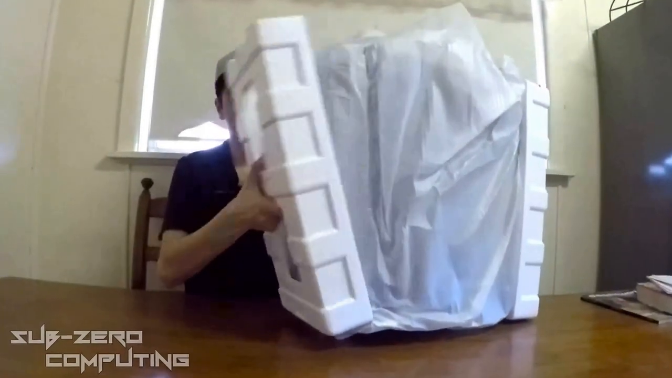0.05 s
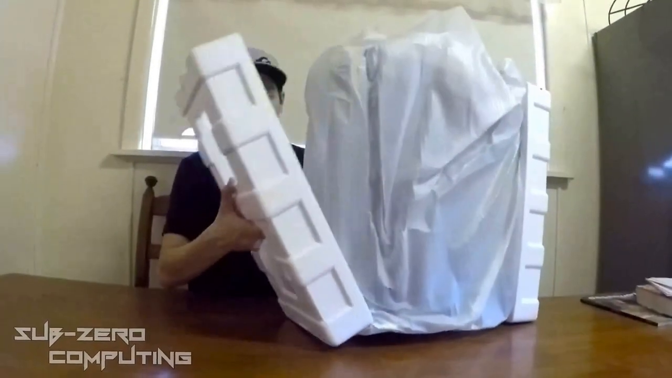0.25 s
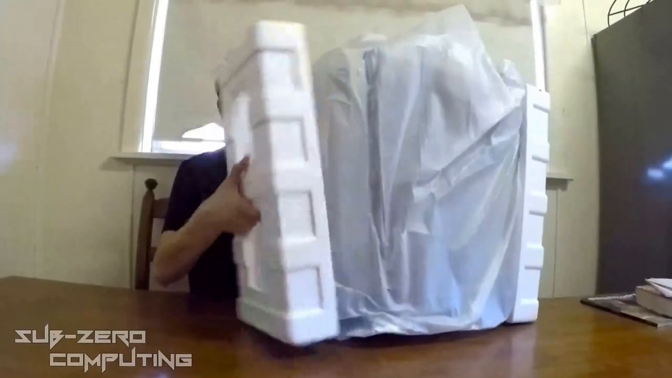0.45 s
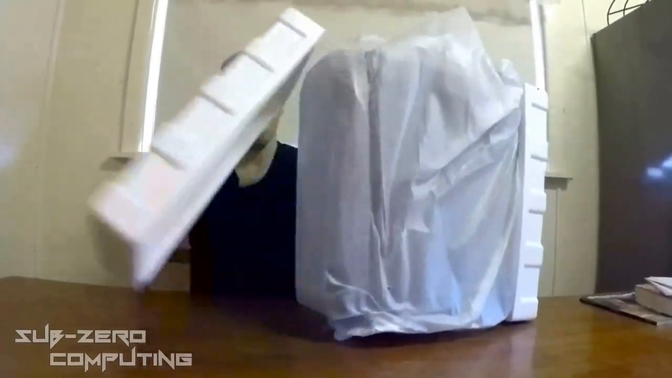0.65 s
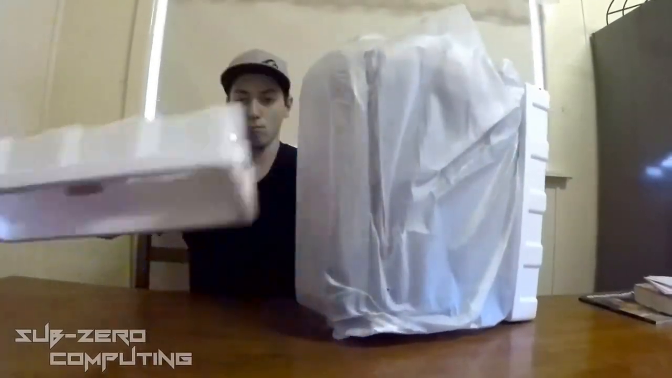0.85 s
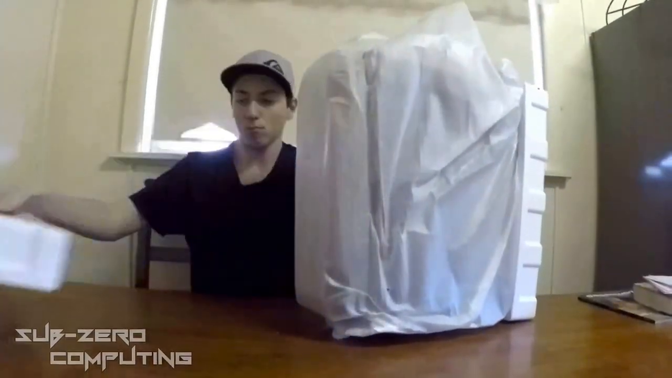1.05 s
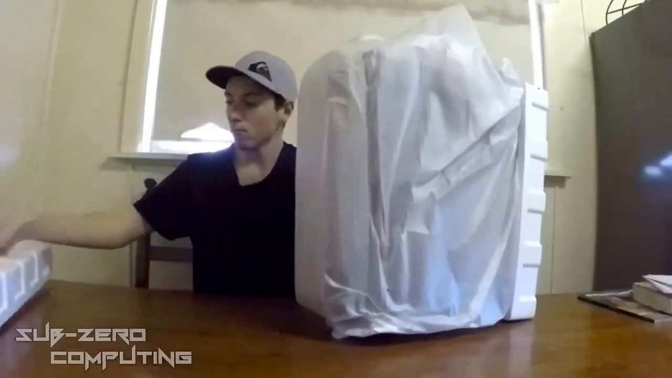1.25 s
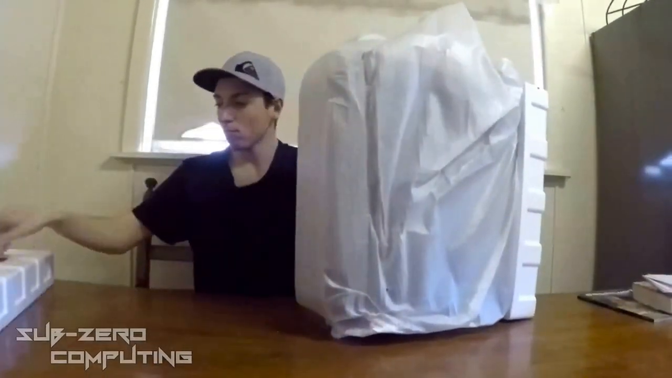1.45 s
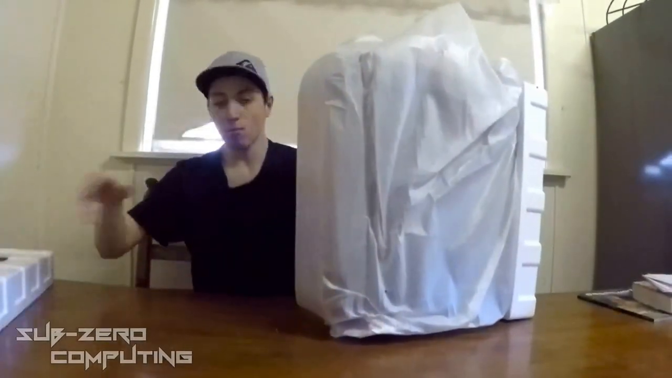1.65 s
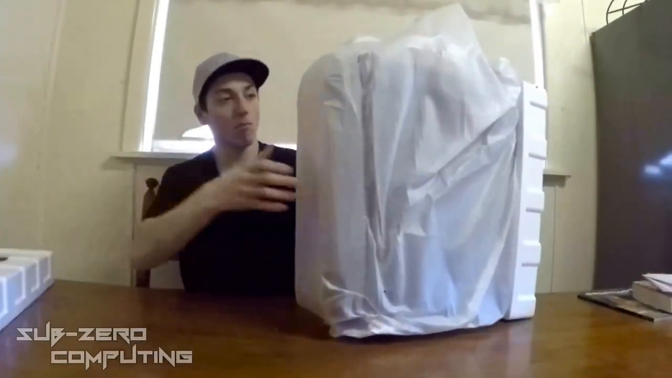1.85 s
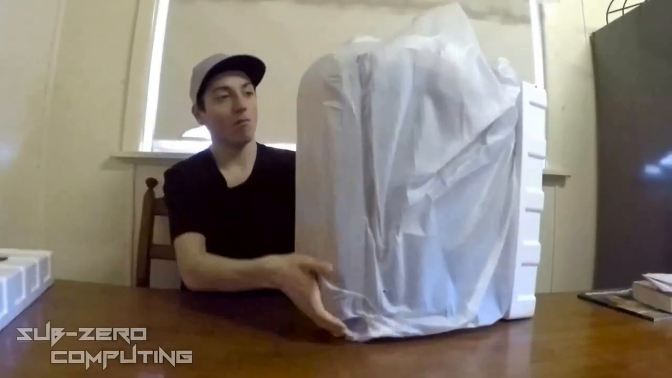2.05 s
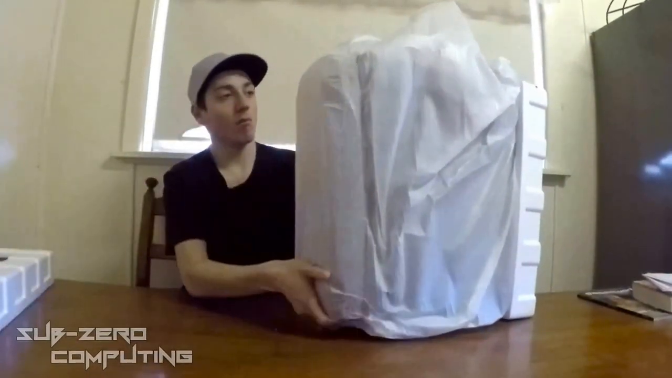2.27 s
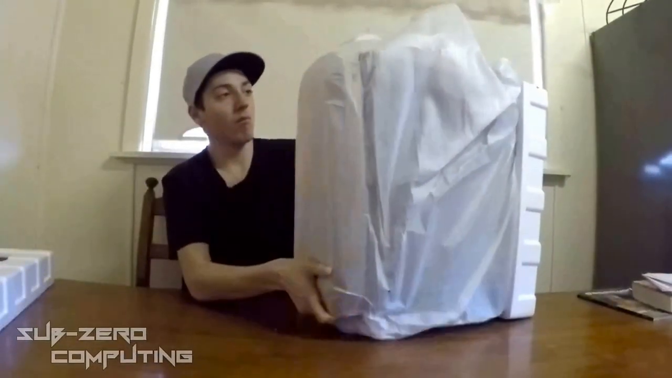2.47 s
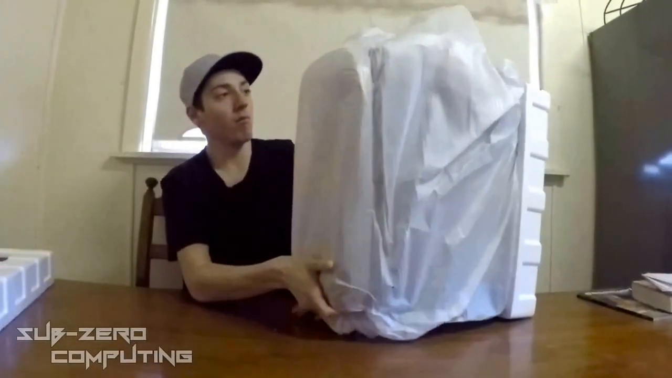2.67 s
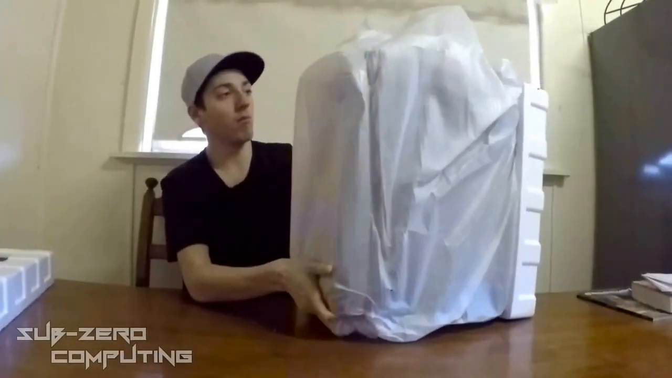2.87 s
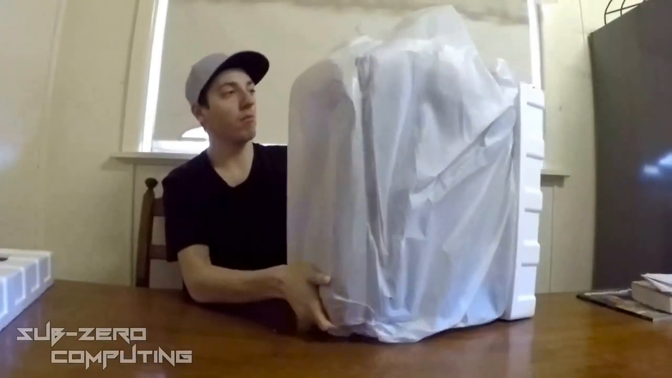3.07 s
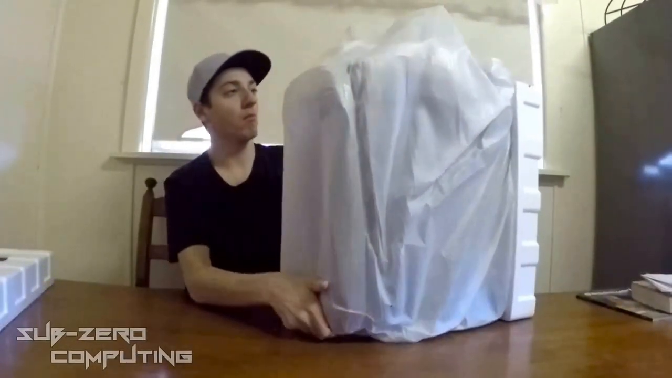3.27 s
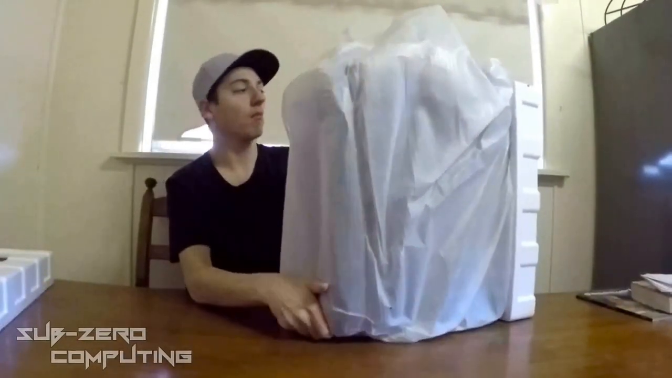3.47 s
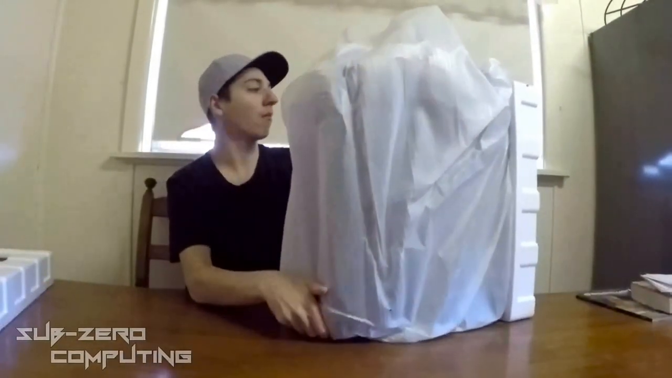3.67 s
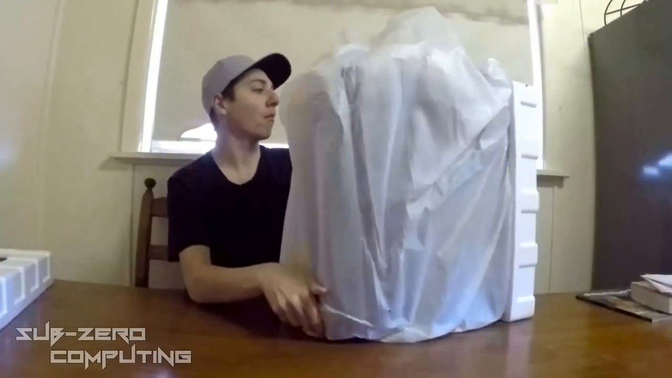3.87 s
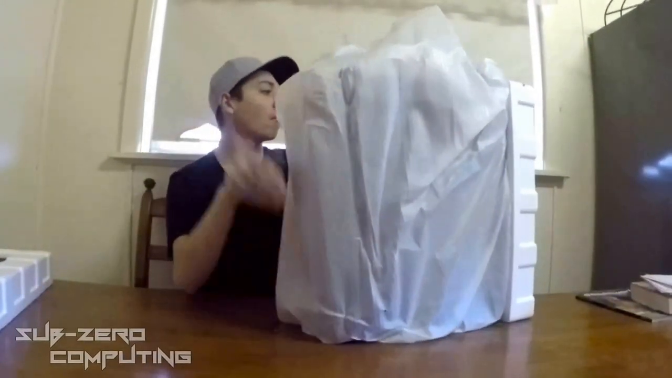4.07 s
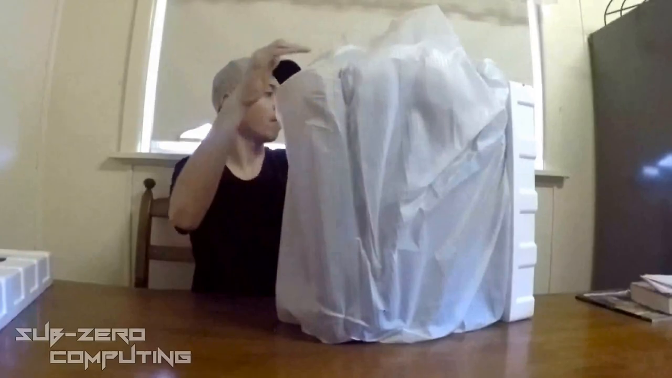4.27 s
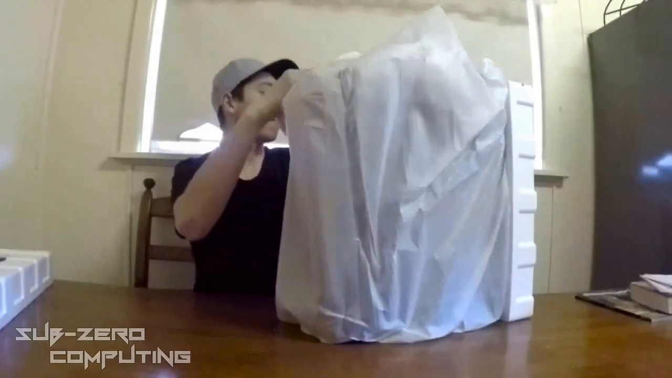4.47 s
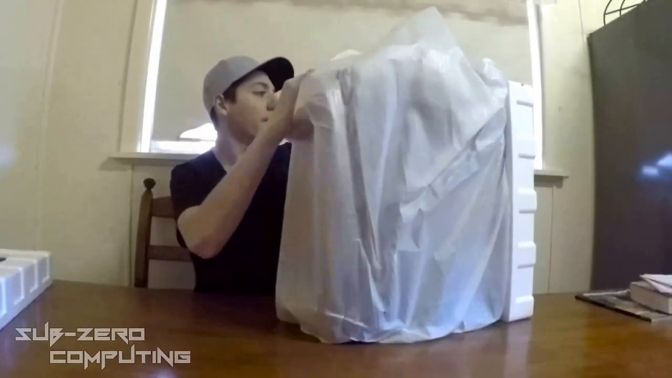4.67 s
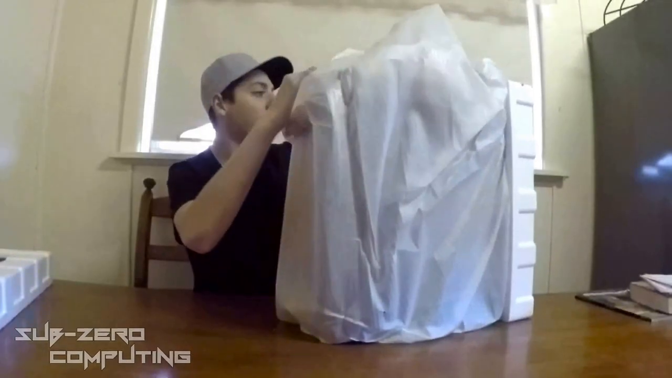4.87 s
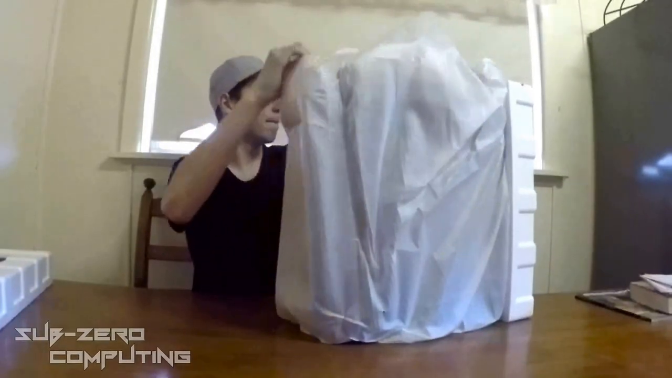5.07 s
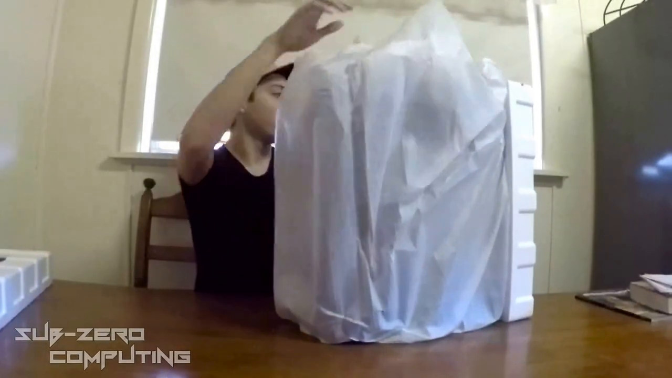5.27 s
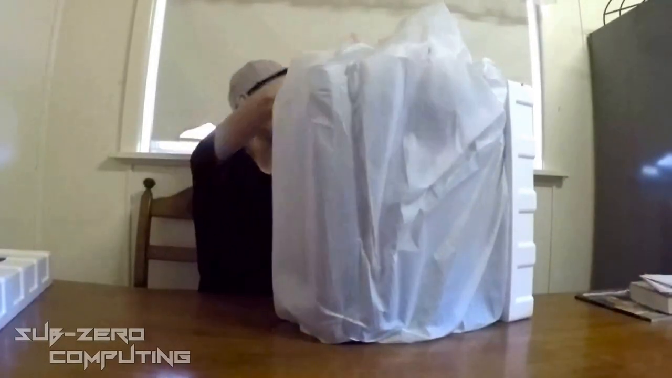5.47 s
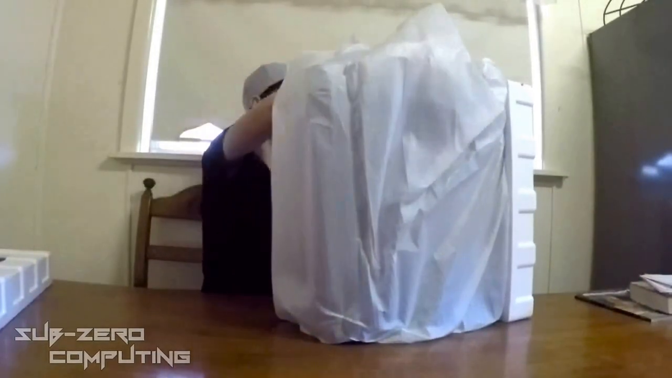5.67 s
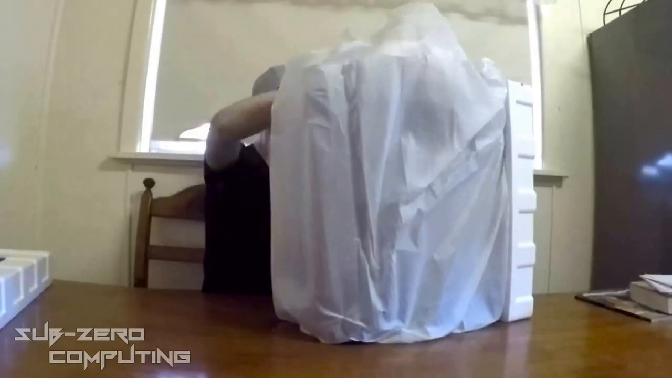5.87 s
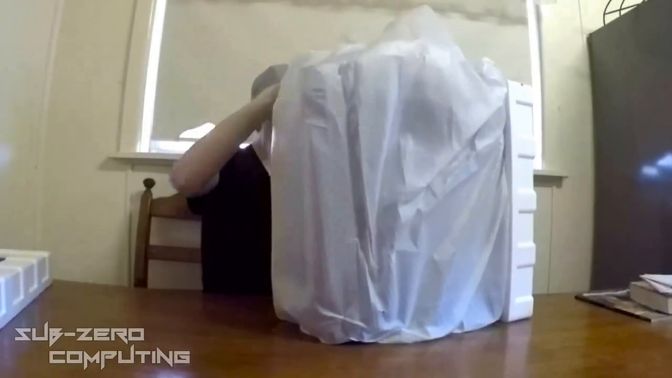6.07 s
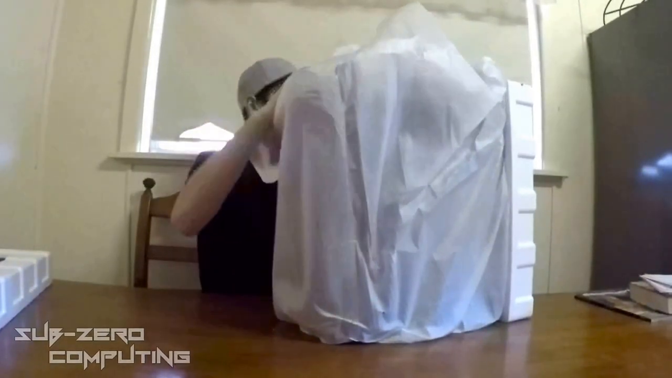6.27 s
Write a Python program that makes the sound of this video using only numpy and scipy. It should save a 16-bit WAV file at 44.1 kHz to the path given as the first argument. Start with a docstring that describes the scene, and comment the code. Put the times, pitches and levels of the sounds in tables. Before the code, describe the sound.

Soft plastic crinkling, a loud boxy polystyrene clack on wood, dry chair creaks, a deep table thump, then faint rustling over a low hum.

```python
"""Foam slab dropped on a wooden table

A polystyrene end cap is pulled off a bagged appliance and dropped on a wooden table in a small, bare room.
The slab and the table top knock as decaying modes with a broad clack; the heavy appliance thumps back down.
A wooden chair creaks by stick-slip clicks through resonances, the bag crinkles as clicks and hiss and snaps
in short noise bursts, weight shuffles dully, and shaped noise and wavering tones make a low household hum."""
import sys
import numpy as np
from scipy import signal
from scipy.fft import rfft, irfft
from scipy.io import wavfile

SR = 44100
rng = np.random.default_rng(int(sys.argv[2]) if len(sys.argv) > 2 else 0)


def persist_wave(psi):
    """Save psi, clipped to +-1, as 16-bit WAV."""
    counts = np.round(np.clip(psi, -1, 1) * 32767).astype(np.int16)
    wavfile.write(sys.argv[1], SR, np.atleast_2d(counts).T)


N = 279153
T = np.arange(N) / SR  # s
FREQS = np.maximum(np.fft.rfftfreq(8192, 1 / SR), 1)  # Hz, kept above zero for the log axis

# All levels are mix levels relative to their own layer; each layer sets its balance further down.

# still room noise: (frequency [Hz], density [dB per Hz])
AIR_SPECTRUM = [(20, 3), (38, -6.5), (65, -4.5), (105, -14), (150, -8), (200, -19.5), (300, -21),
                (450, -26), (800, -30), (1500, -32), (4000, -31.5), (7000, -42.5), (15000, -50.5)]
# steady household tones: (frequency [Hz], rms level [dB])
HUM_TONES = [(32.3, -62), (101, -57), (148, -69), (420, -73)]
# echo decay by band: (frequency [Hz], t60 [s])
ROOM_T60 = [(100, 0.27), (500, 0.77), (2000, 0.98), (5000, 0.82), (14000, 0.36)]

# arms and load shuffle on the table: (time [s], length [s], level [dB], swell from start to end [dB])
SHUFFLES = [(.29, .08, -42, -1), (.46, 0.18, -46, 2), (1.86, 0.59, -51.5, 14), (2.56, 0.1, -38, 9),
            (2.69, 0.075, -40.5, -8), (3.05, 0.086, -47.5, 6), (3.68, 0.12, -53, 5),
            (4.31, 0.058, -49.5, 5), (5.1, 0.13, -56, -2), (6.23, 0.048, -49.5, 6)]
# dull rubbing colour: (frequency [Hz], density [dB per Hz])
SHUFFLE_SPECTRUM = [(25, 8), (70, 12), (130, 6), (220, 9.5), (320, -14), (500, -6), (1200, -8.5),
                    (5000, -26)]
# how a shuffle sets in and dies away: (attack [s], release time constant [s])
SHUFFLE_SHAPE = (0.0077, 0.011)

# a hand or the foam strokes the bag:
# (time [s], length [s], level [dB], swell from start to end [dB], relative fizz [dB])
RUSTLES = [(0, 0.28, -55, -13.5, -0.5), (.27, 0.21, -52, -2.5, 1), (.445, 0.021, -50, -12, 6.5),
           (.555, 0.15, -57, -18.5, -1.5), (.73, 0.053, -56, 2, 0), (.785, 0.037, -53.5, -4, 0.5),
           (.895, 0.045, -57, 5, -14), (1.03, 0.24, -56, -21, 1), (1.255, .05, -46.5, -10, -3),
           (1.47, 0.044, -55.5, 4, -5), (2.02, 0.099, -52.5, -2, -6), (2.11, 0.19, -55, -7, -0.5),
           (2.31, 0.25, -51, 13.5, -1.5), (2.81, .1, -55, -10, 2.5), (3.19, 0.13, -52.5, -9, -1),
           (3.41, 0.17, -58.5, -6, -1), (3.67, 0.048, -57, 1, -0.5), (3.8, 0.21, -59.5, 10, 2.5),
           (3.945, 0.12, -47, -3, -7), (4.39, 0.3, -61, -3, 3), (4.68, 0.044, -62.5, -5.5, -1),
           (4.76, 0.17, -67, 8.5, 3), (4.95, 0.15, -57.5, 3, 4.5), (5.095, 0.12, -54.5, 3.5, 1),
           (5.26, 0.11, -71, 0, 3), (5.72, 0.12, -60.5, 3.5, 3.5), (5.96, 0.19, -60, 3, 2),
           (6.165, 0.12, -55.5, 2, 2.5)]
# body of the plastic film: (frequency [Hz], density [dB per Hz])
FILM_SPECTRUM = [(120, -1), (300, 2.5), (600, 0.5), (1000, 0), (1800, -1.5), (2500, -1.5), (4100, -2),
                 (5500, -5), (8000, -22), (15000, -30.5)]
# bright edge of the film: (frequency [Hz], density [dB per Hz])
FIZZ_SPECTRUM = [(3000, -12.5), (6000, 2.5), (8500, 0.5), (11000, -3), (15000, -8)]
# how a rustle sets in and dies away: (attack [s], release time constant [s])
RUSTLE_SHAPE = (0.004, 0.038)
# single creases snap: (time [s], peak level [dB], relative fizz [dB])
SNAPS = [(0.233, -36, 1), (0.347, -33, -25), (.665, -32.5, 9), (.898, -50, -12), (0.95, -37, -6),
         (2.026, -37, 3), (3.046, -29, 5), (3.993, -27, -9), (4.021, -25.5, -6), (4.237, -31, -15.5),
         (4.909, -38.5, -27)]
# colour of a snap: (frequency [Hz], density [dB per Hz])
SNAP_SPECTRUM = [(500, -26.5), (1300, 0), (2000, -1.5), (4200, 0.5), (6000, -20.5), (15000, -47)]

# the chair creaks as weight shifts: (time [s], length [s], level [dB], swell from start to end [dB],
# relative low frame ring [dB], relative grit [dB])
CREAKS = [(.953, .062, -40, -4, 6, -3.5), (1.754, 0.096, -43.5, 4.5, 5, -2),
          (2.316, 0.041, -41.5, -1, 5, -4.5), (2.512, 0.014, -44.5, -21, 20.5, -1),
          (2.58, 0.19, -40.5, 8.5, 7, -4.5), (2.98, 0.033, -44.5, -6.5, 8.5, -6),
          (3.044, 0.13, -38, 0.5, 3, -4.5), (3.335, 0.053, -38.5, -4.5, 2, -25),
          (3.564, 0.032, -38.5, -3, 2, -14)]
# a joint lets go with one hard slip: (time [s], level [dB])
SLIPS = [(.957, -22.5), (0.967, -23), (0.977, -27), (.99, -25), (1.012, -24), (2.456, -25), (2.5122, -19.5),
         (2.521, -27.5), (2.9816, -27.5), (3.0478, -24.5), (3.0572, -35), (3.338, -29.5), (3.567, -34),
         (3.579, -47), (3.72, -31.5)]
# resonances of the chair frame: (frequency [Hz], width [Hz], level [dB])
FRAME_MODES = [(300, 32, -13), (392, 56, -13), (512, 25, -6.5), (612.3, 33, -4.5), (713, 64, -14.5)]
# resonances of its thin rails: (frequency [Hz], width [Hz], level [dB])
RAIL_MODES = [(979, 88, 2.5), (1220, 160, -2.5), (1720, 200, -4.5), (1880, 120, -10), (2830, 170, -13.5),
              (3188, 290, -8.5), (3710, 74, -16), (5420, 900, -17)]
# dry wood fibres: (frequency [Hz], density [dB per Hz])
GRIT_SPECTRUM = [(1500, -49.5), (3500, 0), (5600, 9), (7500, 1), (10000, -3.5), (15000, -16)]
# how a creak sets in and dies away: (attack [s], release time constant [s])
CREAK_SHAPE = (0.0019, .012)

# blows on the table, soft contacts having a low cut-off and a held slab a short damping:
# (time [s], foam slab level [dB], table top level [dB], contact cut-off [Hz], slab damping time constant [s])
KNOCKS = [(0.2965, -23, -44, 433, 0.026), (.341, -40, -66, 725, 0.17), (1.247, -48, -63, 2980, 0.025),
          (1.2688, -10.5, -31, 607, 0.43), (1.335, -6.5, -35, 7000, 0.58),
          (1.354, -12.5, -36.5, 1130, 0.49), (3.958, -44, -43, 1207, 0.06), (3.992, -33.5, -34, 354, 0.06),
          (4.0109, -39, -9, 210, 0.052), (4.013, -33, -54, 2500, 0.46), (4.04, -23.5, -11.5, 430, 0.36),
          (4.049, -28.5, -21, 428, 0.15), (5.164, -40.5, -50.5, 261, 0.067), (5.191, -34, -45, 224, 0.093),
          (5.233, -52, -47.5, 259, 0.05)]
# hollow ring of the foam slab lying on the table: (frequency [Hz], level [dB])
SLAB_MODES = [(197, -9), (257, 1.5), (284, -0.5), (349, 1.5), (382, -1.5), (470, -28), (489, 1), (522, -5),
              (554, 0.5), (584, 1.5), (642, 4), (681, -50), (713, 10.5), (756, 2.5), (782, 2), (855, -54),
              (906, 4.5), (936, 0), (997, -38), (1034, -12), (1079, -0.5), (1116, -34.5), (1167, 1.5),
              (1200, -42.5), (1231, -28), (1327, -7), (1645, -5.5)]
# broad, dense clack of the slab: (frequency [Hz], density [dB per Hz])
CLACK_SPECTRUM = [(45, -38.5), (90, -14.5), (155, 7), (220, 0.5), (350, 3), (700, 0), (1200, -7),
                  (1900, -14), (2800, -20), (4300, -25.5), (6000, -38), (15000, -25.5)]
# ring of the table top: (frequency [Hz], level [dB], t60 [s])
TABLE_MODES = [(33.4, -13.5, 0.79), (52.3, -1.5, 0.41), (76.4, -8, 0.18), (89.6, 0.5, 0.35),
               (114, -14.5, 0.27), (162, -29, .25), (183, -29.5, 0.91), (254, -15.5, 0.2), (314, -25, .4),
               (368.4, -29.5, 0.45), (476, -43, 0.15)]


def undb(db):
    """Decibels to gain."""
    return 10 ** (np.asarray(db) / 20)


def along(points, hz):
    """Read (frequency, value) points on a log-frequency axis."""
    f, v = np.transpose(points)
    return np.interp(np.log(hz), np.log(f), v)


def unit(x):
    """Scale to rms 1."""
    return x / np.sqrt(np.mean(x ** 2))


def ring(x, response):
    """Pass a drive through an impulse response."""
    return signal.fftconvolve(x, response)[:len(x)]


def fade60(t, t60):
    """Exponential decay that falls 60 dB in t60 seconds."""
    return np.exp(-np.log(1000) * t / t60)


def causal(gain):
    """Sharp-fronted (minimum-phase) impulse response of unit energy with the given gain over FREQS."""
    cepstrum = irfft(np.log(gain))
    half = len(cepstrum) // 2
    # folding the cepstrum forward packs the energy at the front
    cepstrum[1:half] *= 2
    cepstrum[half + 1:] = 0
    h = irfft(np.exp(rfft(cepstrum)))[:half]
    return h / np.linalg.norm(h)


def colour(points):
    """Impulse response of a (frequency, dB) spectrum."""
    return causal(undb(along(points, FREQS)))


def resonances(modes):
    """Impulse response of (frequency, width, dB) resonances, summed in power."""
    power = 0
    for hz, width, db in modes:
        detuning = (FREQS ** 2 - hz ** 2) / (FREQS * width)
        power = power + undb(db) ** 2 / (1 + detuning ** 2)
    return causal(np.sqrt(power))


def lowpass(x, hz, order):
    """Smooth low-pass."""
    return signal.sosfilt(signal.butter(order, min(hz, SR / 2 - 1), fs=SR, output="sos"), x)


def highpass(x, hz, order):
    """Smooth high-pass."""
    return signal.sosfilt(signal.butter(order, hz, "high", fs=SR, output="sos"), x)


def add(out, s, sound):
    """Mix a sound in at a time."""
    i = max(int(s * SR), 0)
    out[i:i + len(sound)] += sound[:N - i]


def strokes(rows, shape):
    """Gain curves of strokes that set in, swell or ease, then die away: the level, then each relative part."""
    attack_s, release_s = shape
    gains = 0
    for s, length, db, swell_db, *relative in rows:
        progress = np.clip((T - s) / length, 0, 1)
        attack = np.clip((T - s) / attack_s, 0, 1)
        release = np.exp(-np.clip((T - s - length) / release_s, 0, 20))
        envelope = undb(db + swell_db * (progress - 0.5)) * attack * release
        gains = gains + np.outer(undb([0, *relative]), envelope)
    return gains


def clicks(rate, spread_db):
    """Random clicks, rate per second on average, of uneven size and either sign."""
    size = undb(spread_db * np.clip(rng.standard_normal(N), -2, 2))
    happens = rng.random(N) < rate / SR
    return unit(happens * size * rng.choice([-1, 1], N))


def friction(rate, spread_db, slide_db):
    """Uneven clicks over a smooth sliding hiss."""
    return unit(clicks(rate, spread_db) + undb(slide_db) * rng.standard_normal(N))


def room_tail(early_db, early_s, gap_s):
    """Diffuse echoes of unit energy: a burst from the near walls, then a tail with its own decay per band."""
    t = T[:SR * 3 // 4]
    noise = rfft(rng.standard_normal(len(t)))
    f = np.fft.rfftfreq(len(t), 1 / SR) + 1
    centres, t60s = np.transpose(ROOM_T60)
    tail = 0
    # each row of the identity matrix gives one band, cross-fading into its neighbours
    for share, t60 in zip(np.eye(len(centres)), t60s):
        band = irfft(noise * np.interp(np.log(f), np.log(centres), share), len(t))
        tail = tail + band * fade60(t, t60)
    burst = 1 + undb(early_db) * np.exp(-t / early_s)
    tail *= burst * np.minimum(t / gap_s, 1)
    return tail / np.linalg.norm(tail)


def in_room(x, direct_db, room_db):
    """Direct sound plus the echoes belonging to one spot in the room."""
    echoes = ring(x, room_tail(early_db=17.5, early_s=0.0092, gap_s=0.011))
    return undb(direct_db) * x + undb(room_db) * echoes


def household(air_db=-47.5, waver_rad=0.6):
    """Low rumble and faint hiss from shaped noise, with a motor hum whose phase slowly wavers."""
    air = unit(ring(rng.standard_normal(N), colour(AIR_SPECTRUM))) * undb(air_db)
    hum = 0
    for hz, db in HUM_TONES:
        drift = unit(lowpass(rng.standard_normal(N), 0.97, order=2))
        tone = np.sin(2 * np.pi * hz * T + waver_rad * drift)
        hum = hum + np.sqrt(2) * undb(db) * tone
    return air + hum


def shuffling():
    """Dull rubbing and small bumps as the weight moves: sparse clicks and hiss with little treble."""
    level, = strokes(SHUFFLES, SHUFFLE_SHAPE)
    drive = friction(rate=95, spread_db=6.5, slide_db=-5.0)
    return ring(level * drive, colour(SHUFFLE_SPECTRUM))


def bag(crease_rate=250, spread_db=6, slide_db=-3, film_db=-2, fizz_db=-8.5, spots=3):
    """Thin film buckles in many tiny creases and hisses as it slides, at several spots at once."""
    level, bright = strokes(RUSTLES, RUSTLE_SHAPE)
    out = 0
    for _ in range(spots):
        film_drive = friction(crease_rate, spread_db, slide_db)
        fizz_drive = friction(crease_rate, spread_db, slide_db)
        film = ring(undb(film_db) * level * film_drive, colour(FILM_SPECTRUM))
        fizz = ring(undb(fizz_db) * bright * fizz_drive, colour(FIZZ_SPECTRUM))
        out = out + in_room(film + fizz, direct_db=-6.0, room_db=-0.5)
    return out


def snaps(decay_s=0.00159, snap_db=-1):
    """Larger creases flip over with a tick, a very short noise burst, some with a fizzy edge."""
    out, t = np.zeros(N), T[:SR // 50]
    for s, db, fizz_db in SNAPS:
        burst = rng.standard_normal(len(t)) * np.exp(-t / decay_s)
        tick = ring(burst, colour(SNAP_SPECTRUM) + undb(fizz_db) * colour(FIZZ_SPECTRUM))
        add(out, s, undb(db + snap_db) * tick / np.abs(tick).max())
    return out


def chair(frame_db=-1, rails_db=1, grit_db=-1, slip_db=14, slip_rails_db=2, slip_grit_db=-6):
    """Stick-slip in the joints: uneven slips ring frame and rails, and dry wood fibres add grit."""
    level, low, grit = strokes(CREAKS, CREAK_SHAPE)
    slipping = friction(rate=260, spread_db=6.5, slide_db=-9)
    scraping = friction(rate=980, spread_db=0, slide_db=7.5)
    hard = np.zeros(N)
    for s, db in SLIPS:
        add(hard, s, undb([db + slip_db]) / 2)  # a single-sample impulse
    frame_drive = undb(frame_db) * low * slipping + hard
    rails_drive = undb(rails_db) * level * slipping + undb(slip_rails_db) * hard
    grit_drive = undb(grit_db) * grit * scraping + undb(slip_grit_db) * hard
    frame = ring(frame_drive, resonances(FRAME_MODES))
    rails = ring(rails_drive, resonances(RAIL_MODES))
    fibres = ring(grit_drive, colour(GRIT_SPECTRUM))
    return frame + rails + fibres


def slab_blow(ring_db=-14.5, t60=0.7, loss=0.62, sag_db=-4.0, sag_s=0.046, clack_db=12.0):
    """One blow on the foam slab: a crack at contact, boxy low modes, and a broad clack that fills the room."""
    clack = room_tail(early_db=2, early_s=0.042, gap_s=0.001) * undb(14.0)
    clack[0] += undb(2.5)  # the crack
    t = T[:len(clack)]
    phases = rng.uniform(0, 2 * np.pi, len(SLAB_MODES))
    lowest = SLAB_MODES[0][0]
    modes = 0
    for (hz, db), phase in zip(SLAB_MODES, phases):
        mode_t60 = t60 / (hz / lowest) ** loss  # foam loses its higher modes sooner
        modes = modes + undb(db) * np.sin(2 * np.pi * hz * t + phase) * fade60(t, mode_t60)
    # the ring is strongest until the slab has settled flat
    modes *= (1 + undb(sag_db) * np.exp(-t / sag_s)) * np.minimum(t / 0.00027, 1)
    return undb(ring_db) * modes + undb(clack_db) * ring(clack, colour(CLACK_SPECTRUM))


def table_blow(t):
    """One blow on the table top: its modes ring and die away, each at its own rate."""
    modes = 0
    for hz, db, t60 in TABLE_MODES:
        modes = modes + undb(db) * np.sin(2 * np.pi * hz * t) * fade60(t, t60)
    return modes


def knocks():
    """Each blow rings slab and table top; a soft contact leaves out the treble, a grip damps the foam."""
    out, t = np.zeros(N), T[:SR * 3 // 4]
    table = table_blow(t)
    for s, slab_db, table_db, contact_hz, damp_s in KNOCKS:
        slab = slab_blow() * np.exp(-t / damp_s)
        blow = undb(slab_db) * slab + undb(table_db) * table
        add(out, s, lowpass(blow, contact_hz, order=5))
    return out


def scene(width_db=-20):
    """Nearly mono; a faint, treble-weighted diffuse layer follows the handling, opposite in the two channels."""
    creaks = in_room(chair(), direct_db=-6.5, room_db=-3)
    ticks = in_room(snaps(), direct_db=-2.0, room_db=-6.0)
    handling = creaks + bag() + ticks
    mid = household() + shuffling() + handling + knocks()
    diffuse = ring(handling, room_tail(early_db=23.0, early_s=0.009, gap_s=0.002))
    side = undb(width_db) * highpass(diffuse, 3000, order=1)
    return np.array([mid + side, mid - side])


def record(dry, low_cut_hz=24, ceiling=0.95, top_hz=15400):
    """The microphone loses the deepest bass; the loudest peaks are rounded and the top is cut."""
    sound = highpass(dry, low_cut_hz, order=2)
    rounded = sound / (1 + (sound / ceiling) ** 4) ** (1 / 4)
    return signal.sosfilt(signal.ellip(10, 0.2, 80, top_hz, fs=SR, output="sos"), rounded)


dry = scene()
out = record(dry)
persist_wave(out)
```